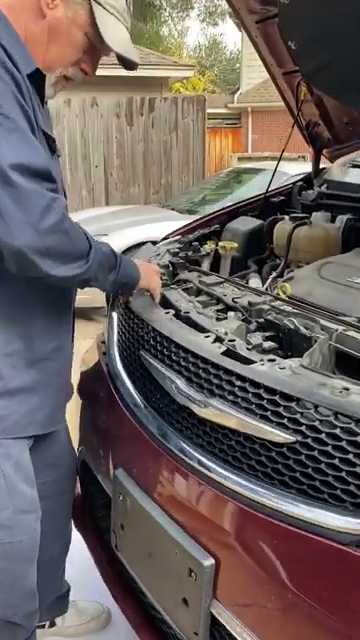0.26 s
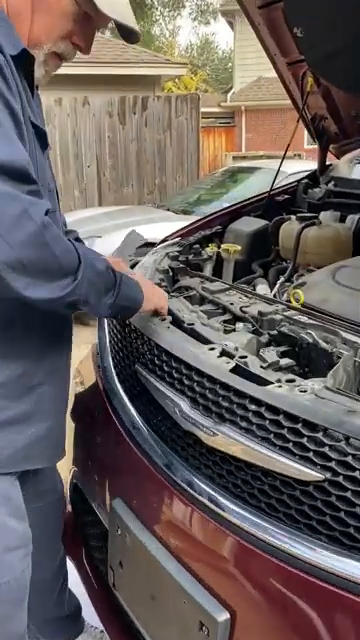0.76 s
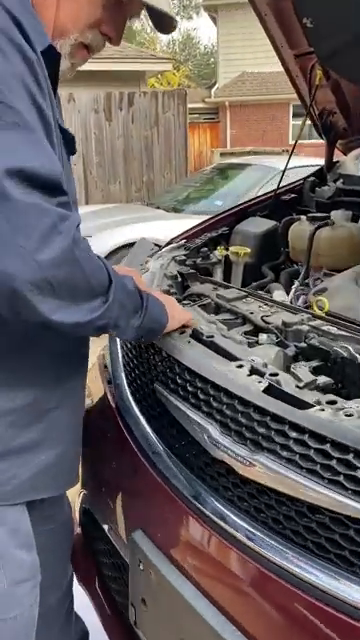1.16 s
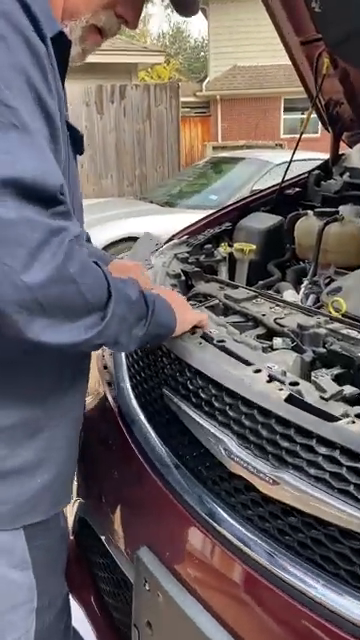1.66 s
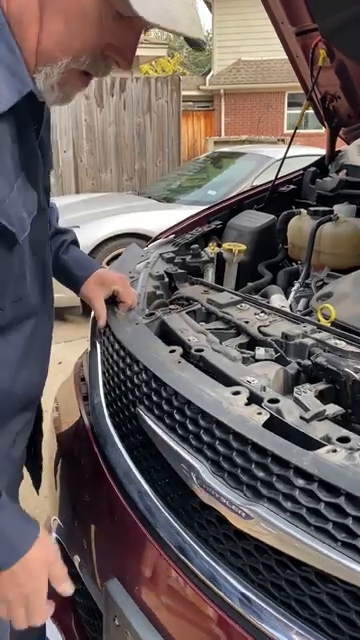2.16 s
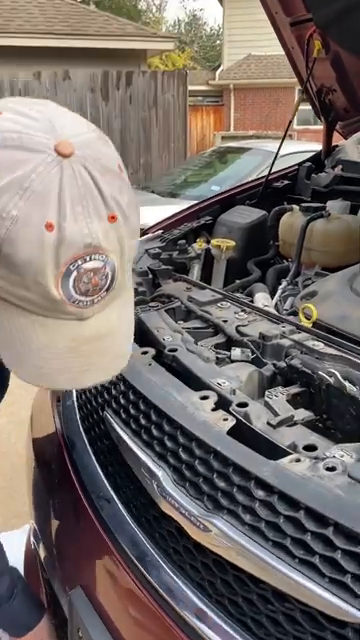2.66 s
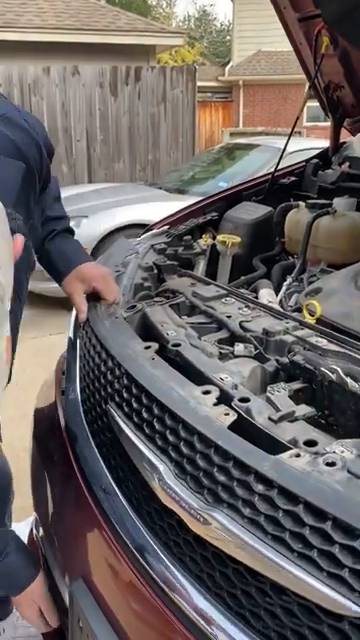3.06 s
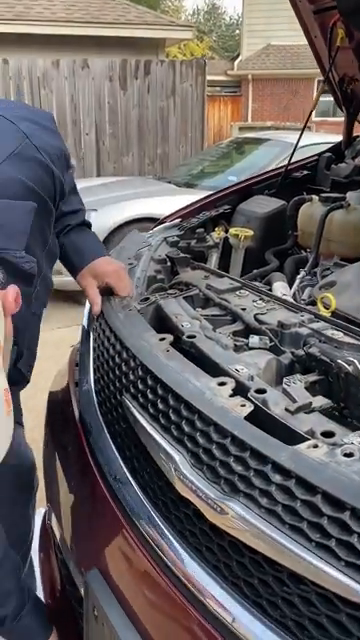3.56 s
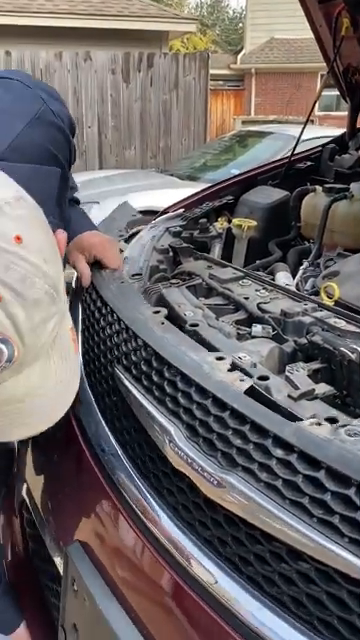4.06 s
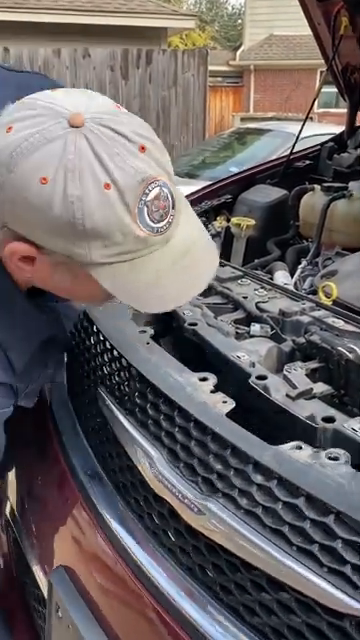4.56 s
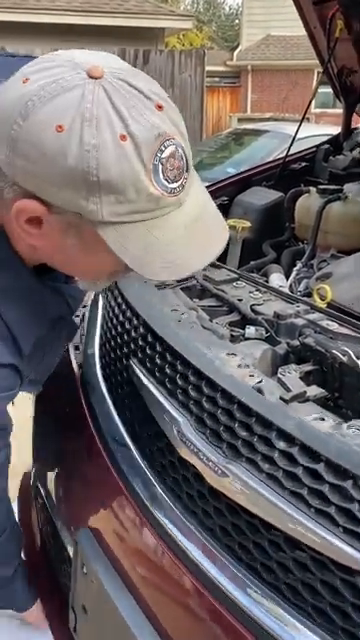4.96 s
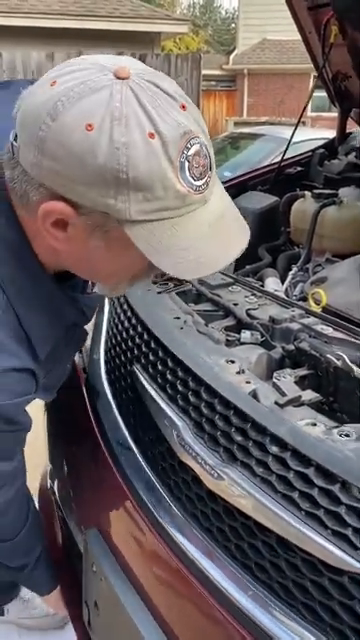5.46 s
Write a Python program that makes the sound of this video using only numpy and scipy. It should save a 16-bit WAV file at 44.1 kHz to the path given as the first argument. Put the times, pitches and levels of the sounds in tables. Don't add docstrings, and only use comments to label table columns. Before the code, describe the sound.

A plastic panel is fitted by hand on a car in a yard, heard near in stereo. Irregular hollow raps, peg clicks and thin edge ticks open the scene; the middle is nearly quiet, with light skin and sleeve rubbing and a tiny rubber squeak. Then hard cracks, one very sharp click, and a run of clattering, thudding knocks finish it over low traffic rumble.

```python
import sys
import numpy as np
from scipy import signal
from scipy.fft import rfft, irfft, next_fast_len
from scipy.io import wavfile
from scipy.ndimage import uniform_filter1d

SR = 44100
rng = np.random.default_rng(int(sys.argv[2]) if len(sys.argv) > 2 else 0)


def materialize(psi):
    bounded = np.clip(np.atleast_2d(psi).T, -1, 1)
    quanta = np.round(bounded * 32767).astype(np.int16)
    wavfile.write(sys.argv[1], SR, quanta)


def convert_level_to_amplitude(level_db):
    exponent = np.asarray(level_db, float) / 20
    return 10 ** exponent


N = 252247

# (frequency [Hz], gain [dB])
RIB_GAIN = [(520, -0.5), (650, -8.5), (900, -2.5), (1300, -1.5), (1800, -2.5), (2400, -8.5), (3000, -2),
            (4000, 0)]
CRACK_GAIN = [(1800, -3), (2500, -2.5), (3400, -4.5), (4300, -5.5), (5200, -2), (6000, -1.5), (7000, 1),
              (8500, -5.5), (10000, -6), (12000, -14.5), (14000, -26), (15000, -40), (16000, -33)]

# (frequency [Hz], density [dB per Hz])
AIR_SPECTRUM = [(59, -28), (100, -3), (236, -12.5), (361, -19), (555, -27), (795, -20), (1060, -25),
                (3980, -39.5), (6000, -41), (7800, -73), (13200, -120)]
AIR_DB = -56.5
# (time [s], level [dB])
TRAFFIC = [(0, -42), (.35, -51.5), (1.2, -46.5), (1.74, -50), (2.39, -46.5), (2.8, -41.5), (3.14, -45.5),
           (3.6, -40.5), (4.67, -52), (5.72, -44)]
# (time [s], level [dB])
FAN = [(.1, -56), (.35, -41.5), (1.27, -39), (1.8, -39), (2.3, -45), (2.5, -44), (3.0, -50.5), (3.46, -46),
       (3.8, -49)]
# (time [s], low boom [dB], upper boom [dB])
SHOVES = [
    (1.33, -39, -72),
    (3.88, -32, -42),
    (4.17, -31, -31),
    (4.74, -40, -44),
    (5.04, -30.5, -30.5),
    (5.14, -47, -29.5),
    (5.2, -33, -31),
    (5.6, -33, -52),
]
SHOVE_RISE_S, SHOVE_T60_S = 0.012, 0.51

# (frequency [Hz], left lead [rad])
PORT_PHASE = [(0, -.05), (120, -.07), (430, -.5), (1400, -.5), (1900, -.1), (2900, 2.1), (3960, .7),
              (4500, 1.2), (5000, .8), (6300, 1.85), (6850, 2.95), (7100, np.pi), (7700, np.pi),
              (8050, 3.45), (9800, 2 * np.pi), (11000, 2 * np.pi), (13000, 3 * np.pi), (14200, 3 * np.pi),
              (14900, 12), (15700, 12.1), (16400, 10.8)]
# (frequency [Hz], left over right [dB])
PORT_BALANCE = [(150, 0), (380, -1), (800, -1.8), (1900, .8), (2400, -.8), (3500, -2.2), (5000, -2.4),
                (6000, .7), (6900, 0)]
# (frequency [Hz], share [dB])
DIFFUSE = [(60, -56), (200, -43), (400, -5.5), (1500, -9), (2500, -8.5), (4000, -4), (6300, -39),
           (7300, -12), (8800, -7), (10400, -21), (12000, -18), (13700, -28), (15500, -18)]
# (low edge [Hz], high edge [Hz], t60 [s], level [dB])
TAIL = [
    (93, 564, 0.33, -8.5),
    (365, 1440, 0.11, -1),
    (1480, 4300, 0.078, 0),
    (3460, 4550, 0.056, -5),
    (6660, 13000, 0.09, -6),
]
SCATTER_DB, SCATTER_S = 0.5, 0.0006

# (time [s], rib [dB], thump [dB], crack [dB], ring [Hz])
SNAPS = [(.16, -20, -37.5, -27, 2450), (1.113, -30.5, -34.5, -39.5, 3760), (1.302, -17.5, -38, -26, 4800),
         (1.696, -30.5, -49, -48.5, 940), (1.768, -25, -40, -45.5, 1180), (2.152, -37.5, -50, -47.5, 1510),
         (3.868, -20.5, -28.5, -30, 1460), (3.902, -12, -31.5, -22, 2500), (4.165, -12, -23.5, -30, 1750),
         (4.207, -24.5, -32, -36, 1990), (4.257, -25, -41, -29, 1360), (4.273, -35, -28.5, -37, 1900),
         (4.311, -19.5, -33, -26, 1950), (4.413, -38.5, -53, -52, 1790), (4.426, -27, -40, -61, 1770),
         (4.541, -21.5, -40, -47.5, 1150), (4.5674, -13, -61, -19, 6230), (4.954, -11, -31, -59, 2750)]
SNAP_THUMP_HZ = 202.4
# (time [s], rib [dB], thump [dB], crack [dB], thump [Hz])
RAPS = [(.045, -21, -44, -38, 307), (.164, -18, -20, -31.5, 323.3), (0.221, -21, -37, -32.5, 316),
        (.344, -44.5, -55, -46, 150), (0.58, -29, -62, -38, 453), (1.116, -29.5, -36.5, -47, 254),
        (1.309, -17.5, -30, -24, 629), (1.315, -14.5, -34, -28, 311.6), (1.931, -25.5, -30, -42.5, 352),
        (1.972, -20, -32, -28, 493), (2.56, -27, -44, -38, 726), (2.624, -45, -42.5, -45.5, 158),
        (2.75, -40, -66, -51, 187), (2.852, -54, -46, -66, 255), (3.151, -38.5, -48, -48, 401),
        (3.974, -25, -28.5, -37.5, 321), (3.991, -24.5, -47, -42.5, 289), (4.156, -5.5, -16, -10, 477),
        (4.174, -42, -27, -17.5, 588), (4.686, -33.5, -42.5, -45, 363), (4.71, -19.5, -38, -27.5, 332),
        (4.738, -46, -42.5, -46, 346)]
RAP_RING_HZ = 840
# (time [s], rib [dB], thump [dB], thump [Hz])
BUMPS = [(.129, -21, -35, 347), (.25, -30, -36.5, 456), (.362, -57, -44.5, 558), (.531, -42, -49, 565),
         (1.146, -41.5, -35.5, 231), (1.329, -28, -30, 358), (1.746, -27, -34.5, 326),
         (1.866, -61, -55, 151), (1.884, -46, -67, 150), (1.895, -39, -39.5, 365), (1.909, -40, -58, 194),
         (1.95, -25, -34, 622), (2, -26.5, -38.5, 191), (2.97, -58, -56, 151), (3.388, -68, -38.5, 167),
         (3.785, -32.5, -44, 340), (3.883, -26.5, -26, 147), (3.925, -60, -45, 188), (4.03, -42, -52, 187),
         (4.074, -29.5, -38, 330), (4.181, -45, -36, 376), (4.369, -27.5, -42, 206),
         (4.456, -32.5, -62, 185), (4.512, -28, -38.5, 197), (4.59, -65, -35, 268), (4.99, -22, -33, 195),
         (5.333, -27, -26, 375.4), (5.512, -48, -30.5, 307)]
BUMP_RING_HZ, BUMP_CRACK_DB = 800, -23
# (time [s], rib [dB], crack [dB], thump [Hz])
SEATING = [(4.922, -23, -47.5, 661), (4.958, -18.5, -34, 651), (5.029, -16.5, -38.5, 242),
           (5.038, -13.5, -38.5, 600), (5.045, -14, -40.5, 223), (5.062, -8.5, -30.5, 324),
           (5.071, -23, -54, 270), (5.12, -18, -28.5, 734), (5.124, -9, -28.5, 457), (5.14, -15, -37, 149),
           (5.156, -14.5, -22.5, 285), (5.177, -19, -27, 662), (5.189, -16, -26, 189),
           (5.225, -21.5, -48, 340), (5.245, -29, -36, 151), (5.261, -24.5, -38, 200),
           (5.307, -26, -34.5, 638), (5.322, -14, -23, 279.5), (5.362, -21.5, -41, 144),
           (5.489, -42, -48.5, 215), (5.503, -28.5, -34.5, 650), (5.583, -15.5, -27.5, 532),
           (5.59, -16.5, -29, 539), (5.603, -19.5, -32, 464), (5.63, -27.5, -49.5, 151),
           (5.654, -33.5, -48.5, 203)]
SEAT_RING_HZ, SEAT_THUMP_DB = 780, -11
CONTACTS = 10
# (time [s], peak [dB])
TICKS = [(0.0962, -54), (0.5656, -42), (0.6828, -49), (0.758, -37), (0.876, -47), (0.8943, -34),
         (1.04, -39.5), (1.069, -36), (1.088, -39), (1.1964, -44), (1.214, -40.5), (1.2294, -47),
         (1.281, -38), (1.5908, -50), (2.81, -45), (2.9336, -34.5), (3.0494, -71), (3.5207, -46),
         (3.867, -14.5), (4.144, -30), (4.4667, -46), (4.568, -23), (4.6385, -32), (4.842, -37),
         (4.9033, -32), (5.503, -24.5)]

# (time [s], level [dB])
GRIP = [(0, -50), (.17, -39.5), (.35, -50), (.88, -54.5), (1.3, -53), (1.61, -57.5), (1.74, -44.5),
        (2.05, -52), (2.39, -61), (2.61, -48.5), (3.15, -64), (3.7, -54.5), (3.98, -34.5), (4.56, -40),
        (4.78, -45.5), (5.14, -26), (5.36, -38), (5.72, -37)]
# (start [s], length [s], level [dB])
STROKES = [(0.047, 0.26, -66), (0.378, 0.19, -69.5), (0.59, 0.21, -63.5), (0.878, 0.11, -70),
           (1.186, 0.063, -73), (1.735, 0.035, -66), (1.866, 0.08, -63), (2.02, 0.46, -70.5),
           (2.524, 0.25, -73.5), (2.8, 0.23, -71), (3.382, 0.3, -73), (3.734, 0.17, -70), (3.86, 0.34, -77),
           (4.25, 0.27, -73), (4.498, 0.081, -63.5), (4.616, 0.58, -67), (5.038, .09, -79),
           (5.118, 0.14, -82), (5.46, 0.26, -72)]
REST_DB, STROKE_EDGE_S = -79, 0.03
RUB_SLIDE_DB, RUB_GRIP_DB = 14, -26
SCUFF_SLIDE_DB, SCUFF_GRIP_DB = 6.5, -22.5
BUZZ_RIB_DB, BUZZ_CRACK_DB, BUZZ_T60_S = -16, -23, 0.16
SHEEN_DB = -6

# (start [s], level [dB], centre [Hz], width [octaves], t60 [s])
HISSES = [(0.019, -66, 2500, 1.4, 0.16), (.54, -62, 1580, 0.82, 0.26), (1.335, -36.5, 700, 3.1, 0.29),
          (1.33, -51, 2310, .3, 0.5), (4.152, -38, 4000, 1.2, 0.054), (2.24, -58.5, 1500, 2.4, 0.71),
          (2.82, -73, 3000, 1.1, 0.81), (3.858, -38, 3000, 2, .1), (5.61, -54, 3000, 2, .3),
          (.185, -46.5, 1180, 1.9, 0.46), (1.932, -50.5, 3800, .6, 0.2), (4.052, -69, 10000, 0.26, 0.54),
          (4.185, -54, 1200, 1.9, .4), (4.502, -71, 10500, 0.37, 0.44), (4.552, -47, 5000, .8, .1),
          (4.576, -48.5, 5700, 0.2, 0.42), (4.782, -59, 9700, 0.23, 1), (4.972, -48, 1200, 1.4, 0.29),
          (5.082, -36, 895, 1.2, 0.27), (5.202, -35, 890, 1, 0.21)]
RASP_DB, RASP_HZ = 1.5, 110
# (time [s], level [dB], ring [Hz])
PIPS = [(0.076, -34, 890), (.153, -34, 1800), (.255, -42, 2340), (.262, -29, 494), (.272, -26.5, 474),
        (1.121, -33, 1110), (1.127, -47, 616), (1.14, -35, 500), (1.694, -26, 1110), (1.704, -22, 670),
        (1.767, -28.5, 1830), (1.979, -24.5, 2170), (1.99, -28, 1870), (2.007, -35.5, 1920),
        (2.765, -54, 700), (2.806, -44, 2500), (2.806, -46, 4000), (2.856, -47, 610), (2.933, -59, 4060),
        (2.937, -46, 2180), (2.969, -47, 1030), (2.999, -46.5, 900), (4.257, -26, 5500), (4.272, -38, 2080),
        (4.292, -35, 2210), (4.311, -14, 1890), (4.365, -32, 2370), (4.374, -29.5, 1866),
        (4.413, -30, 1790), (4.428, -36, 1800), (4.457, -40, 1150), (4.501, -40, 1030),
        (4.518, -31.5, 1040), (4.527, -29, 1080), (4.542, -35, 1190), (4.559, -30, 4860),
        (4.568, -11.5, 1560), (4.924, -18, 664), (4.959, -13, 660), (5.041, -19, 634), (5.068, -19, 686),
        (5.127, -15, 650), (5.155, -19, 3420), (5.183, -25, 3550), (5.246, -29, 3200), (5.26, -26, 3230),
        (5.324, -15.5, 3610), (5.33, -14.5, 1860), (5.365, -24.5, 2000), (0.164, -15.5, 340),
        (.172, -20, 320), (.178, -31, 335), (0.125, -30, 1200), (3.155, -37, 745), (5.585, -38, 614),
        (5.418, -47, 4260), (4.156, -7.5, 5500), (4.207, -20, 1970),
        (0.218, -23.5, 5520), (.221, -30, 3760), (0.221, -35, 2550), (.162, -22.5, 3650),
        (1.113, -41, 3920), (1.119, -27, 248), (1.304, -16, 5350), (1.312, -17, 2400), (1.317, -29, 6240),
        (1.325, -27, 810), (1.352, -26.5, 298), (1.897, -28, 760), (1.938, -30, 560), (1.946, -27, 634),
        (1.971, -17, 5570), (2.562, -33, 1083), (2.57, -30, 604), (2.756, -51, 2530), (3.151, -48, 2040),
        (3.163, -37, 450), (3.867, -25, 3280), (3.867, -20.5, 5300), (3.907, -17, 4500),
        (3.975, -29.5, 3800), (4.16, -12, 4850), (4.175, -32, 4970), (4.309, -22, 5700), (4.569, -1, 6180),
        (4.712, -27.5, 3460), (4.7, -46, 5500), (4.955, -28, 2300), (5.04, -37, 5500), (5.064, -25, 2560),
        (5.065, -26, 5200), (5.121, -25, 5500), (5.158, -26, 5670), (5.19, -39, 5300), (5.325, -18.5, 5850),
        (5.592, -36, 5700), (5.718, -47, 2300), (5.316, -22, 620), (5.581, -26, 523), (1.126, -42, 550),
        (1.965, -21, 400), (4.165, -20, 290), (5.135, -19, 390), (5.072, -16, 900), (4.991, -28, 800),
        (5.228, -32, 1700), (3.867, -34, 15600), (5.503, -42, 14700), (5.125, -42, 15000), (1.14, -37, 240),
        (5.062, -20, 640)]
PIP_RISE_S, PIP_T60_S, PIP_CYCLES, PIP_SPREAD = 0.00013, 0.012, 9.6, 0.14
# (time [s], level [dB])
SPARKS = [(0.16, -29), (1.302, -34), (3.865, -40), (4.16, -25), (4.174, -17.5), (4.256, -29), (4.27, -36),
          (4.311, -40), (4.468, -49), (4.569, -13), (4.639, -34.5), (4.701, -39), (4.709, -37),
          (4.739, -36), (4.843, -52), (4.905, -37), (5.503, -34), (5.582, -31)]
SPARK_S, SPARK_HZ = 0.00046, 5500
# (time [s], pitch [Hz], level [dB])
BIRD = [
    (1.44, 5250, -83),
    (1.48, 5400, -77),
    (1.515, 5540, -74),
    (1.55, 5380, -76),
    (1.59, 5400, -77),
    (1.65, 5180, -82),
]
# (time [s], pitch [Hz], level [dB])
SQUEAK = [
    (2.22, 1210, -71),
    (2.272, 1220, -64),
    (2.32, 1200, -63),
    (2.374, 1220, -64),
    (2.42, 1210, -75),
]


def rms_one(x):
    return x / np.sqrt(np.mean(x ** 2) + 1e-20)


def in_time(rows):
    s, *columns = np.transpose(rows)
    return [np.interp(np.arange(N) / SR, s, c) for c in columns]


def at_hz(points, hz):
    f, value = np.transpose(points)
    return np.interp(np.log(hz + 1), np.log(f + 1), value)


def band(x, lo_hz, hi_hz):
    return signal.sosfilt(signal.butter(2, [lo_hz, hi_hz], "band", fs=SR, output="sos"), x + 1e-18)


def coloured(x, gain):
    size = next_fast_len(N + 4096)
    hz = np.arange(size // 2 + 1) * SR / size
    return irfft(rfft(x, size) * gain(hz), size)[..., :N]


def drift(rate_hz):
    r = np.exp(-2 * np.pi * rate_hz * 40 / SR)
    slow = signal.lfilter([1], [1, -2 * r, r * r], rng.standard_normal(N // 40 + 2002))[2000:]
    return np.interp(np.arange(N) / 40, np.arange(len(slow)), rms_one(slow))


def ring(clicks, hz, t60_s):
    r, w = convert_level_to_amplitude(-60 / (t60_s * SR)), 2 * np.pi * hz / SR
    return signal.lfilter([0, np.sin(w)], [1, -2 * r * np.cos(w), r * r], clicks + 1e-18)


def grains(per_s, spread_db):
    sizes = convert_level_to_amplitude(spread_db * np.minimum(rng.exponential(1, N), 5)) * rng.choice([-1, 1], N)
    return sizes * (rng.random(N) < per_s / SR)


def dying(s, level_db, t60_s):
    steps = np.zeros(N)
    np.add.at(steps, (np.asarray(s) * SR).astype(int), convert_level_to_amplitude(level_db))
    return signal.lfilter([1], [1, -convert_level_to_amplitude(-60 / (t60_s * SR))], steps + 1e-18)


def shaking(column):
    shoves = np.array(SHOVES)
    decay = dying(shoves[:, 0], shoves[:, column], SHOVE_T60_S)
    return uniform_filter1d(decay, int(4 * SHOVE_RISE_S * SR))


def street():
    (traffic_db,), (fan_db,) = in_time(TRAFFIC), in_time(FAN)
    air = coloured(rng.standard_normal(N),
                   lambda hz: convert_level_to_amplitude(at_hz(AIR_SPECTRUM, hz)) * (hz > 130) * (hz < 6500))
    rumble = rms_one(band(rng.standard_normal(N), 45.3, 82.7))
    fan_hz = 113 + 1.273 * drift(2.9)
    tone = np.sqrt(2) * np.sin(2 * np.pi * np.cumsum(fan_hz) / SR) * convert_level_to_amplitude(0.32 * drift(9.6))
    fan = 0.45 * tone + 0.5 * rms_one(band(rng.standard_normal(N), 103, 124))
    low = (convert_level_to_amplitude(traffic_db) + shaking(column=1)) * rumble
    low = low + (convert_level_to_amplitude(fan_db) + shaking(column=2)) * fan
    return convert_level_to_amplitude(AIR_DB) * rms_one(air), low


def knocks():
    snaps = [(s, rib, thump, crack, SNAP_THUMP_HZ, hz) for s, rib, thump, crack, hz in SNAPS]
    raps = [(*row, RAP_RING_HZ) for row in RAPS]
    bumps = [(s, rib, thump, rib + BUMP_CRACK_DB, hz, BUMP_RING_HZ) for s, rib, thump, hz in BUMPS]
    seating = [(s, rib, rib + SEAT_THUMP_DB, crack, hz, SEAT_RING_HZ) for s, rib, crack, hz in SEATING]
    return np.array(snaps + raps + bumps + seating)


def hands():
    grip_db, = in_time(GRIP)
    slide = np.full(N, convert_level_to_amplitude(REST_DB))
    for s, length_s, level_db in STROKES:
        slide[int(s * SR):int((s + length_s) * SR)] = convert_level_to_amplitude(level_db)
    slide = uniform_filter1d(slide, int(STROKE_EDGE_S * SR))
    s, rib_db, _, crack_db = knocks()[:, :4].T
    rub = np.hypot(slide * convert_level_to_amplitude(RUB_SLIDE_DB), convert_level_to_amplitude(grip_db + RUB_GRIP_DB))
    rub = rub + dying(s, rib_db + BUZZ_RIB_DB, BUZZ_T60_S)
    scuff = np.hypot(slide * convert_level_to_amplitude(SCUFF_SLIDE_DB), convert_level_to_amplitude(grip_db + SCUFF_GRIP_DB))
    scuff = scuff + dying(s, crack_db + BUZZ_CRACK_DB, BUZZ_T60_S)
    return grip_db, 20 * np.log10(rub), 20 * np.log10(scuff), 20 * np.log10(slide)


def thumps(flex_db):
    out, t = np.zeros(N + 8000), np.arange(8000) / SR
    blows = knocks()
    for (s, _, level_db, _, hz, _), (detune, turn) in zip(blows, rng.random((len(blows), 2))):
        swell = 1 - np.exp(-t / 0.0024)
        partner_hz = hz * (0.506 + 0.271 * detune)
        upper_hz = hz * (1.197 + 0.25 * turn)
        main = np.sin(2 * np.pi * hz * t) * convert_level_to_amplitude(-60 * t / 0.08)
        partner = np.sin(2 * np.pi * (partner_hz * t + turn)) * convert_level_to_amplitude(-8.0 - 60 * t / 0.15)
        upper = np.sin(2 * np.pi * (upper_hz * t + detune)) * convert_level_to_amplitude(-8.5 - 60 * t / 0.072)
        out[round(s * SR):][:8000] += convert_level_to_amplitude(level_db + 9.0) * swell * (main + partner + upper)
    creak = sum(ring(grains(150, spread_db=4.5), hz, 5.5 / hz) for hz in np.geomspace(150, 600, 8))
    return out[:N] + convert_level_to_amplitude(flex_db - 0.5) * rms_one(creak)


def chatter(s, level_db, length_s, scatter_db):
    late = rng.uniform(-0.45, 1, (len(s), CONTACTS))
    late[:, 0] = 0
    fade_db = np.where(late < 0, -6 + 40 * late, -11 * late)
    size = convert_level_to_amplitude(level_db[:, None] + fade_db + scatter_db * rng.standard_normal(late.shape))
    at = ((s[:, None] + np.reshape(length_s, (-1, 1)) * late) * SR).astype(int)
    train = np.zeros(N)
    np.add.at(train, np.clip(at, 0, N - 1), size * rng.choice([-1, 1], late.shape))
    return train


def favoured(hz):
    return 8 * np.exp(-(np.log2(hz / knocks()[:, 5]) / 0.37) ** 2)


def ribs(rub_db):
    knock, rub = 0, 0
    s, level_db = knocks()[:, :2].T
    ring_hz = knocks()[:, 5]
    for hz in np.geomspace(480, 3600, 30):
        gain = convert_level_to_amplitude(at_hz(RIB_GAIN, hz))
        dull_db = 5 * np.clip(np.log2(hz / ring_hz) - 0.8, 0, 3)
        hits = chatter(s, level_db - 22.5 + favoured(hz) - dull_db, 0.013, scatter_db=5.0)
        knock = knock + gain * ring(hits, hz, 0.016 + 11 / hz)
        rub = rub + gain * ring(grains(300, spread_db=1.5), hz, 3.84 / hz)
    soft = signal.sosfilt(signal.butter(3, 3000, fs=SR, output="sos"), knock)
    return soft + convert_level_to_amplitude(rub_db - 4.5 + 5.4 * drift(15.5)) * rms_one(rub)


def cracks(scuff_db, rustle_db):
    knock, scuff, rustle = 0, 0, 0
    s, rib_db, _, level_db = knocks()[:, :4].T
    slide_s = 0.005 + 0.00076 * np.clip(rib_db - level_db - 5.5, 0, 25)
    tick_s, tick_db = np.transpose(TICKS)
    for hz in np.geomspace(2000, 15500, 30):
        sharp_db = 0.12 * (level_db + 7.5) * max(np.log2(hz / 6000), 0)
        hits = chatter(s, level_db - 8.5 + favoured(hz) + sharp_db, slide_s, scatter_db=4.5)
        hits += chatter(tick_s, tick_db - 13 + 8 * np.log2(hz / 10000), 0.007, scatter_db=3.0)
        gain = convert_level_to_amplitude(at_hz(CRACK_GAIN, hz))
        knock = knock + gain * ring(hits, hz, 0.0076 + 18 / hz)
        fine = gain * ring(grains(1500, spread_db=2.0), hz, 4.4 / hz)
        if hz < 7000:
            scuff = scuff + fine
        else:
            rustle = rustle + fine * convert_level_to_amplitude(-38 * (hz > 13500))
    patchy = convert_level_to_amplitude(2.2 * drift(12) + 1.5 * drift(4))
    sheen = band(band(rng.standard_normal(N), 14500, 15700), 14500, 15700)
    rubbing = convert_level_to_amplitude(scuff_db - 0.5) * rms_one(scuff)
    rubbing = rubbing + convert_level_to_amplitude(rustle_db + 4.5) * rms_one(band(rustle, 1800, 13700))
    rubbing = rubbing + convert_level_to_amplitude(rustle_db + SHEEN_DB) * rms_one(sheen)
    return knock + patchy * rubbing


def scatter(x):
    burst = rng.standard_normal(400) * np.exp(-np.arange(400) / (SCATTER_S * SR))
    near = signal.oaconvolve(x * drift(16.0), burst / np.linalg.norm(burst))[:N]
    return convert_level_to_amplitude(SCATTER_DB) * band(near, 820, 17000)


def yard(x):
    t, noise = np.arange(12000) / SR, rng.standard_normal((2, 12000))
    response = 0
    for lo_hz, hi_hz, t60_s, level_db in TAIL:
        fade = convert_level_to_amplitude(level_db - 60 * t / t60_s) / np.sqrt(t60_s * SR / 14)
        response = response + fade * band(noise, lo_hz, hi_hz)
    response = response * (1 - np.exp(-t / 0.0078))
    return signal.oaconvolve(x[None], response, axes=1)[:, :N]


def hisses():
    noise = rng.standard_normal(N) * convert_level_to_amplitude(RASP_DB * drift(RASP_HZ))
    out = 0
    for s, level_db, hz, octaves, t60_s in HISSES:
        half = 2 ** (octaves / 2)
        swell = uniform_filter1d(dying([s], [level_db], t60_s), 500)
        out = out + swell * rms_one(band(noise, hz / half, hz * half))
    return out


def pips():
    out, t = np.zeros(N + 3000), np.arange(3000) / SR
    clicks = PIPS
    for (s, level_db, hz), turns in zip(clicks, rng.random((len(clicks), 3))):
        near_hz = hz * (1 + PIP_SPREAD * (np.arange(3) - 1.5 + turns))
        modes = np.sin(2 * np.pi * (near_hz[:, None] * t + turns[:, None])).sum(axis=0)
        fade = (1 - np.exp(-t / PIP_RISE_S)) * convert_level_to_amplitude(-60 * t / (PIP_T60_S + PIP_CYCLES / hz))
        out[round(s * SR):][:3000] += convert_level_to_amplitude(level_db - 4.0) * fade * modes
    return out[:N]


def sparks():
    out = np.zeros(N + 400)
    fade = np.exp(-np.arange(400) / (SPARK_S * SR))
    for (s, level_db), burst in zip(SPARKS, rng.standard_normal((len(SPARKS), 400))):
        out[round(s * SR):][:400] += convert_level_to_amplitude(level_db + 8.5) * burst * fade
    return band(out[:N], SPARK_HZ, 13200)


def whistle(rows, waver_hz):
    hz, level_db = in_time(rows)
    t = np.arange(N) / SR
    gate = np.clip(np.minimum(t - rows[0][0], rows[-1][0] - t) / 0.02, 0, 1)
    phase = 2 * np.pi * np.cumsum(hz + waver_hz * drift(31)) / SR
    return gate * convert_level_to_amplitude(level_db + 3) * np.sin(phase)


def ports(x, sign):
    return coloured(x, lambda hz: convert_level_to_amplitude(sign * at_hz(PORT_BALANCE, hz) / 2)
                    * np.exp(0.5j * sign * np.interp(hz, *np.transpose(PORT_PHASE))))


def scene():
    flex_db, rub_db, scuff_db, rustle_db = hands()
    air, low = street()
    panel = thumps(flex_db) + ribs(rub_db) + cracks(scuff_db, rustle_db)
    echo = yard(panel)
    together = panel + echo[0] + air + low + hisses() + pips() + sparks()
    together = together + whistle(BIRD, waver_hz=15.5) + whistle(SQUEAK, waver_hz=39.5)
    diffuse = echo[1] + scatter(panel) + convert_level_to_amplitude(5.5) * air[::-1]
    apart = coloured(diffuse, lambda hz: convert_level_to_amplitude(at_hz(DIFFUSE, hz)))
    return np.array([ports(together + apart, 1), ports(together - apart, -1)])


def band_limit(x):
    return signal.sosfilt(signal.butter(12, 16600, fs=SR, output="sos"), x)


def record(dry):
    mix = signal.sosfilt(signal.butter(6, 38, "high", fs=SR, output="sos"), dry)
    mix = 1.02 * np.tanh(mix / 1.02)
    mix = signal.sosfilt(signal.butter(7, 13900, fs=SR, output="sos"), mix)
    return band_limit(mix)


dry = scene()
out = record(dry)
materialize(out)
```